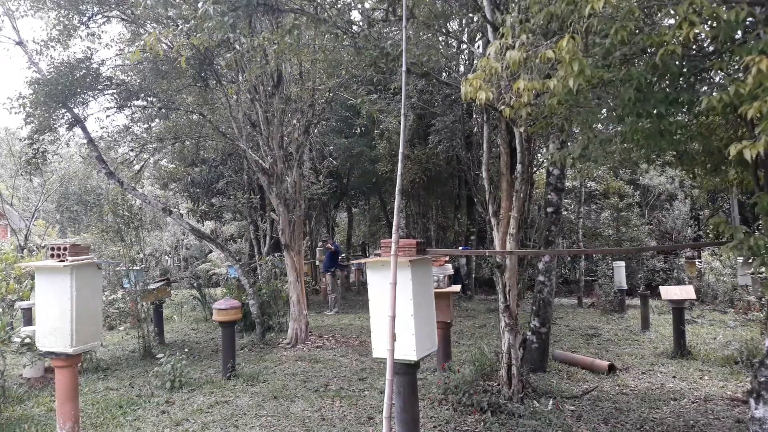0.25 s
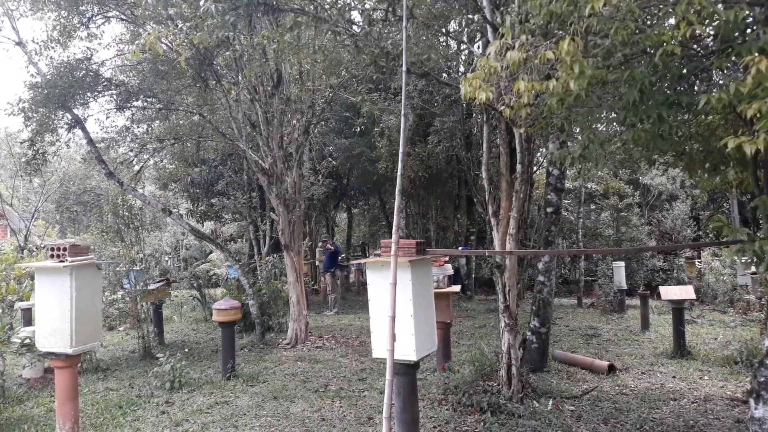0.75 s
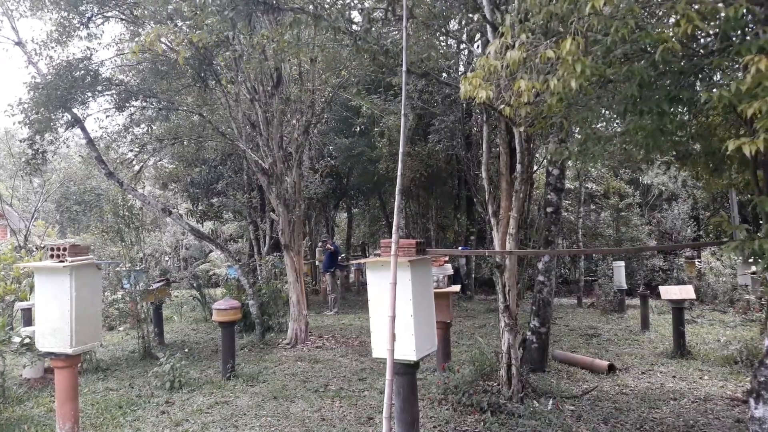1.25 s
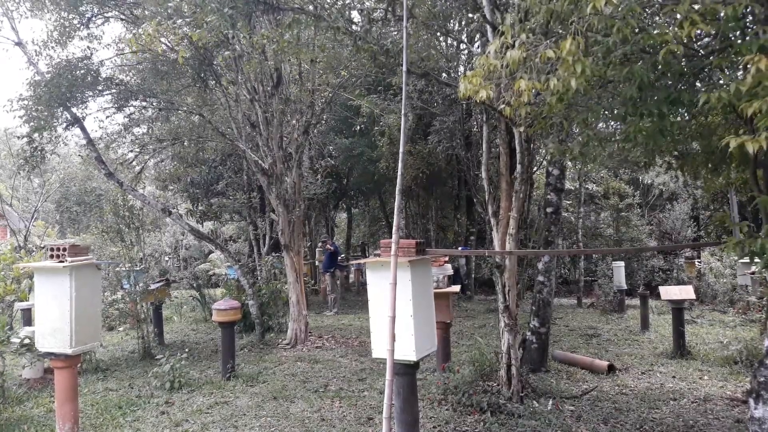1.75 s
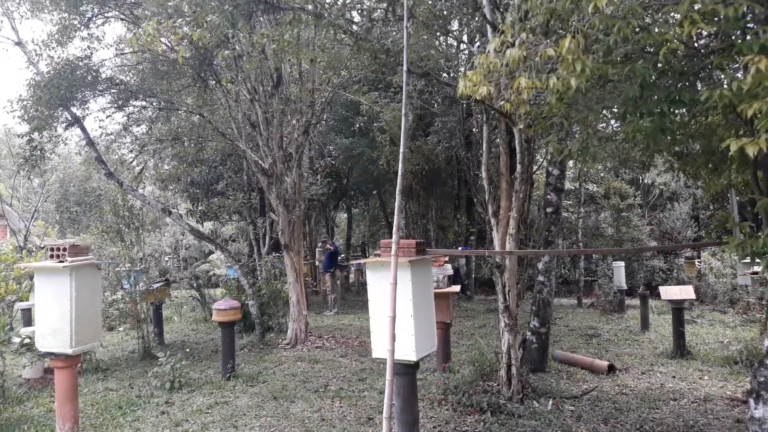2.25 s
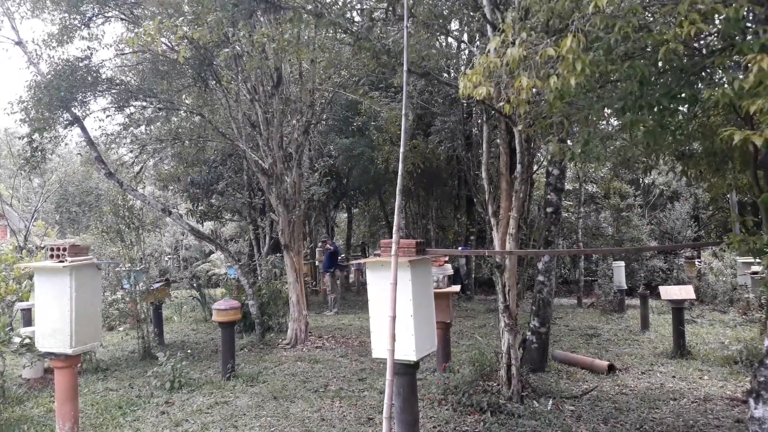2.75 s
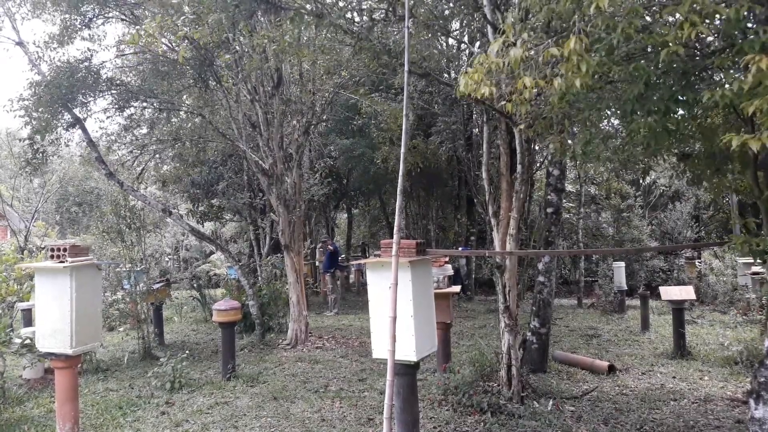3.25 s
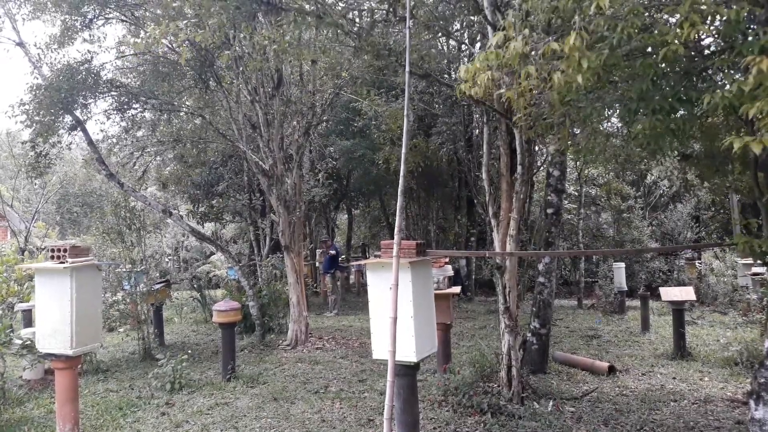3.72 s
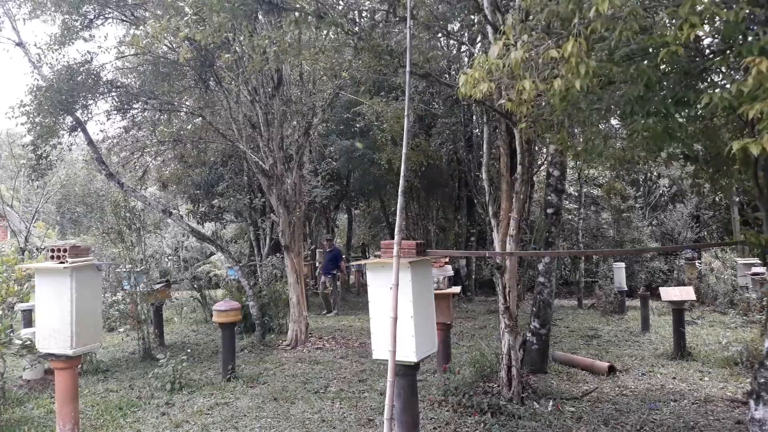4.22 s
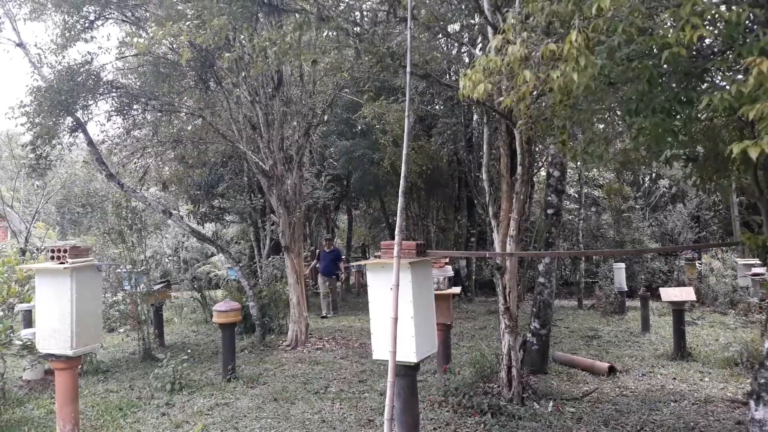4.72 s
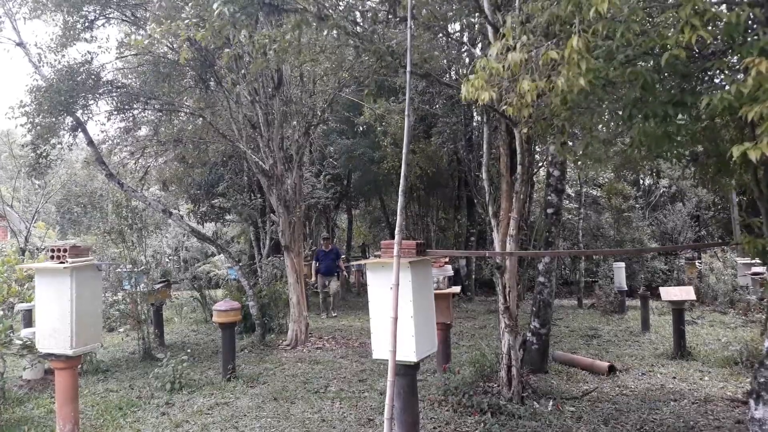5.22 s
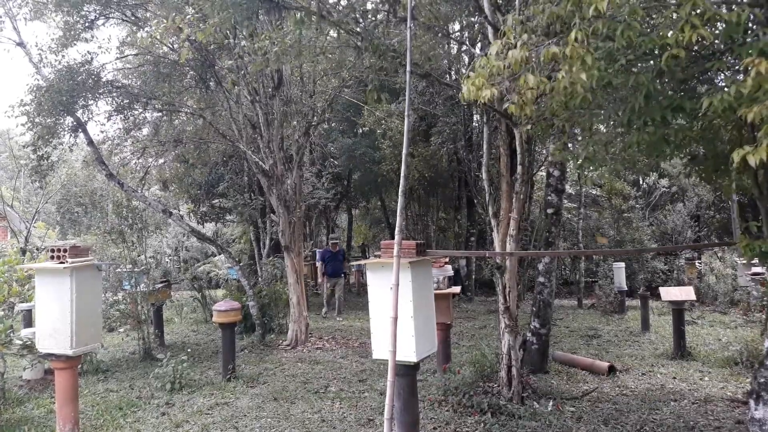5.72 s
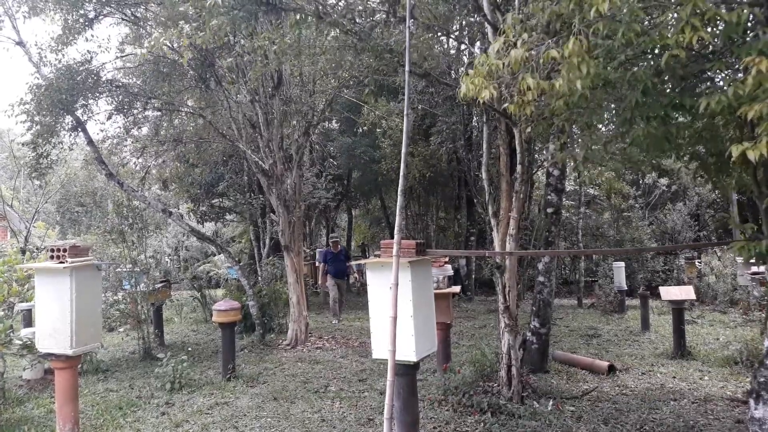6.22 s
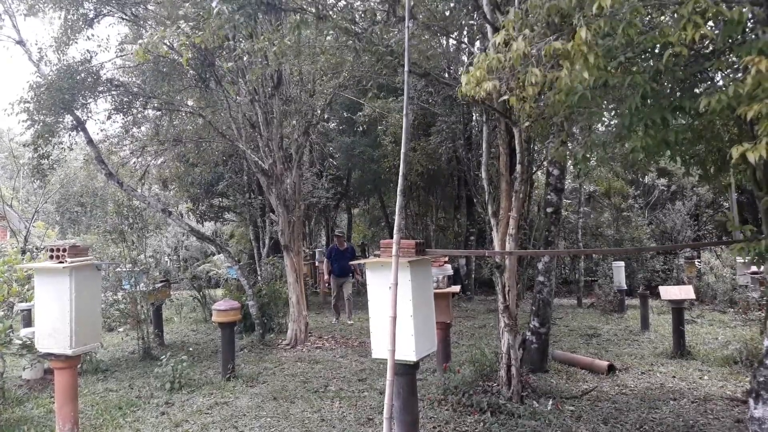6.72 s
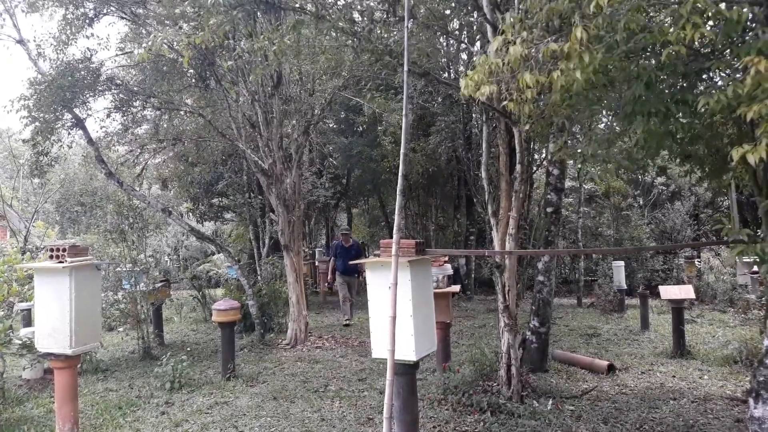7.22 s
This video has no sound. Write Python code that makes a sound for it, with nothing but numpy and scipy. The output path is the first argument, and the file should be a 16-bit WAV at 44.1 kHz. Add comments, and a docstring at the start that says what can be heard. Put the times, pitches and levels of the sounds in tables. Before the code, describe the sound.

Outdoors in a breezy wooded garden, one sharp close slingshot snap and woody knock echo off trunks, followed later by a softer distant double knock.

```python
"""Slingshot in a wooded garden

Wind, as fluttering bands of noise, hisses through the trees and slowly eases; low gusts buffet the microphone.
A slingshot cracks twice among lesser snaps: a short noise burst, the knock of the pellet on wood as decaying
modes, then echoes scattered by the trunks as decaying noise. Narrow noise bands give a brief whoosh, then
faint swelling hums, perhaps a distant vehicle. The recorder is mono; its gain control ducks for a second
after the first, loudest crack, then creeps back."""
import sys
import numpy as np
from scipy import signal
from scipy.fft import rfft, irfft, next_fast_len
from scipy.io import wavfile
from scipy.ndimage import uniform_filter1d, minimum_filter1d

SR = 44100
rng = np.random.default_rng(int(sys.argv[2]) if len(sys.argv) > 2 else 0)


def materialize(psi):
    """Save the field psi as 16-bit PCM at rate SR to the path in sys.argv[1].

    A 1-D psi becomes a single channel; in a 2-D psi each row is a channel.
    """
    bounded = np.clip(np.atleast_2d(psi).T, -1, 1)
    quanta = np.round(bounded * 32767).astype(np.int16)
    wavfile.write(sys.argv[1], SR, quanta)


N = 329427
TIME = np.arange(N) / SR  # time in the scene, s
AGE = np.arange(24000) / SR  # time since a snap or knock began, s

# snaps of rubber, pellet and twigs:
# t/s, level/dB, brightness/(dB per octave), echo/dB, treble lost to distance/dB at 12 kHz
SNAPS = [(3.2830, -19, 5.5, -2.5, 17), (3.314, -31, 4, 2, 0), (3.4055, -7.5, -1, 1.5, 0),
         (3.562, -34.5, 5, -1, 0), (4.005, -32.5, 0.5, 0, 3), (4.052, -34.5, 4, 0, 3),
         (4.382, -36, 2, -3, 6), (6.056, -18.5, -4, 0, 5), (6.073, -25, -2, -3, 4),
         (6.0803, -19.5, 1, -1, 20), (6.4257, -25.5, 0.5, 1, 10)]
# spectrum of a snap: f/Hz, density/(dB per Hz)
SNAP_COLOUR = [(200, -18), (1000, -11.5), (2400, -2), (3300, 0), (3900, -4), (4700, 1), (6300, -5),
               (7700, -7), (8900, 2), (10300, -6.5), (14500, -1), (16000, -17)]
# the pellet on wood: t/s, body, ring/dB, near scatter/dB, scatter t60/s, late echo/dB,
# hardness/(dB per octave), rise/s
KNOCKS = [(3.4089, "target", -7.5, -15.5, 0.16, -23, -0.5, 0.00046),
          (6.0615, "trunk", -25, -24.5, 0.23, -31.5, -1, .0005),
          (6.0791, "trunk", -29.5, -29.5, .2, -41, 8.5, .0005),
          (6.433, "branch", -41, -31, 0.088, -38, 4, 0.0009),
          (6.457, "branch", -22.5, -39, .2, -52, -5, 0.012)]
# modes of the near wooden target: f/Hz, level/dB, t60/s
TARGET = [(315, -23.5, 0.35), (436, -23.5, 0.52), (940, -10, 0.22), (1117, -18, 0.26), (1350, -6.5, 0.18),
          (1510, -13, 0.26), (1743, -3, 0.1), (1757, -1.5, 0.13), (1985, -5.5, 0.098), (2210, -9, 0.042),
          (2210, 4, 0.099), (2500, -15, 0.27), (3540, -29, 0.12), (4430, -16, 0.13), (4680, -16, .18)]
# modes of the far trunk: f/Hz, level/dB, t60/s
TRUNK = [(477, -19, .2), (682, -1, 0.068), (918, -5, 0.17), (1070, 11.5, 0.031), (1560, -1, 0.18),
         (2401, -4, .2), (2463, -2, 0.21), (2693, -9, 0.2), (2880, -10, 0.17), (3620, -16, .2),
         (3950, -14, .16)]
# modes of the branch that the pellet glances off: f/Hz, level/dB, t60/s
BRANCH = [(1626, -2, 0.14), (1911, -9, 0.17), (2500, -15, 0.18)]
# spectrum of the echoes around the target: f/Hz, density/(dB per Hz)
TARGET_COLOUR = [(100, -7.5), (400, -5), (750, -4.5), (1000, -8), (1600, -3.5), (2200, -0.5), (3200, -12),
                 (4000, -15), (4800, -7), (6000, -18), (7800, -17), (9200, -10), (10500, -23), (16000, -24)]
# spectrum of the echoes around the trunk and the branch: f/Hz, density/(dB per Hz)
FAR_COLOUR = [(100, -18), (300, -12), (550, -0.5), (1100, -1.5), (2000, -1), (2600, 0), (3700, -8),
              (4500, -14), (6300, -8.5), (7500, -14), (9200, -19), (10500, -23), (16000, -33)]
# each body: modes, echo spectrum
BODIES = {"target": (TARGET, TARGET_COLOUR), "trunk": (TRUNK, FAR_COLOUR), "branch": (BRANCH, FAR_COLOUR)}
# the strongest eddies that hit the microphone: t/s, peak level/dB
EDDIES = [(.048, -25), (.443, -27), (2.867, -32), (3.306, -21.5), (4.341, -20), (4.365, -25),
          (4.495, -22.5), (4.587, -22.5), (4.901, -19), (4.981, -21.5), (5.064, -17), (5.116, -23),
          (5.192, -26), (5.327, -24), (5.627, -26.5), (6.347, -23.5), (6.955, -26)]
# gusts that reach the microphone: t/s, length/s, level/dB
GUSTS = [(0, 0.46, -43), (3.57, .16, -38), (4.31, .4, -37), (4.85, .28, -35.5), (6.02, 0.11, -40.5),
         (6.617, 0.33, -44)]
# spectrum of the turbulence at the microphone: f/Hz, density/(dB per Hz)
RUMBLE = [(20, -18), (40, -7.5), (68, 2.5), (110, 1.5), (180, -6.5), (260, -18.5), (500, -55)]
# spectrum of the wind in the trees: f/Hz, density/(dB per Hz)
TREES = [(50, -24), (100, -7), (160, -3), (228, -1), (380, -3.5), (850, -4), (1280, -9), (1870, -6.5),
         (2750, -10.5), (5190, -14.5), (6560, -18), (8830, -15.5), (10200, -23), (15800, -26.5)]
# a brief whoosh, then faint hums, perhaps a distant vehicle: t/s, half length/s, f/Hz, level/dB
WHOOSH_AND_HUMS = [(.12, 0.15, 920, -45), (.95, 0.17, 228, -46.5), (1.397, 0.17, 245, -49),
                   (2.4, 0.076, 217, -43.5)]

SNAP_S = 0.0021  # length of a snap's burst
# an eddy of the reference strength: pitch and half length; stronger ones pass faster and are more abrupt
EDDY_DB, EDDY_HZ, EDDY_S = -25, 111.2, 0.0058
EDDY_DB_PER_OCTAVE, EDDY_DB_PER_HALVING = 24, 11
GUST_ATTACK_S, GUST_RELEASE_S = 0.04, 0.12
# turbulence in the lulls between gusts slowly builds
LULL_DB, LULL_DB_PER_S = -53.5, 0.65
# the wind in the treetops starts strong and eases towards a steady strength
BREEZE_START_DB, BREEZE_END_DB, BREEZE_EASE_S = 1.5, -6.0, 8.15
TOP_HZ = 15800  # upper band edge of the recorder


def snaps(echo_t60=0.26, patchy_db=3.0):
    """Impulse and scattering: trunks and foliage throw a burst of milliseconds back as a patchy spray."""
    out = np.zeros(N)
    size = len(AGE)
    for start, db, tilt, echo_db, loss_db in SNAPS:
        pulse = AGE * np.exp(-np.minimum(1.9 * AGE / SNAP_S, 10) ** 2)
        burst = noise(SNAP_COLOUR, size, tilt, loss_db) * pulse
        swell_and_decay = fade(echo_t60) * (1 - fade(0.011))
        spray = noise(SNAP_COLOUR, size, tilt, loss_db) * swell_and_decay
        spray = spray * undb(patchy_db * walk(304, size=size))
        # the level is the rms over the length of the burst
        gain = undb(db) * np.sqrt(SNAP_S / AGE[-1])
        add(out, start, gain * (unit(burst) + undb(echo_db) * unit(spray)))
    return out


def pellets():
    """Impact excitation: one hit on the near target, later double knocks on a far trunk and a branch."""
    out = np.zeros(N)
    for start, body, *blow in KNOCKS:
        modes, colour = BODIES[body]
        add(out, start, knock(modes, colour, *blow))
    return out


def knock(modes, colour, ring_db, scatter_db, scatter_t60, late_db, hardness, rise_s, late_t60=0.85):
    """Modal ringing and reverberation: a harder contact favours the modes above 1.5 kHz.

    Near trunks scatter the knock densely; the deeper wood answers faintly and longer."""
    ring = 0
    for hz, db, t60 in modes:
        gain = undb(db + hardness * np.log2(hz / 1500))
        ring = ring + gain * fade(t60) * np.sin(2 * np.pi * (hz * AGE + rng.random()))
    near_scatter = undb(scatter_db) * fade(scatter_t60)
    late_echo = undb(late_db) * fade(late_t60)
    echoes = noise(colour, len(AGE)) * (near_scatter + late_echo)
    return (undb(ring_db) * ring + echoes) * (1 - np.exp(-AGE / rise_s))


def buffeting(lumpy_db=3.3, chirp=0.22):
    """Turbulent pressure: each big eddy swings the diaphragm once or twice, slowing as it passes."""
    lumps = unit(undb(lumpy_db * walk(30)))
    out = noise(RUMBLE, next_fast_len(N, True))[:N] * lumps * gusts()
    t = np.arange(-1800, 1800) / SR  # time from the middle of the eddy
    for middle, db in EDDIES:
        hz = EDDY_HZ * 2 ** ((db - EDDY_DB) / EDDY_DB_PER_OCTAVE)
        length = EDDY_S * 0.5 ** ((db - EDDY_DB) / EDDY_DB_PER_HALVING)
        cycles = np.cumsum(hz * (1 - chirp * np.tanh(t / length))) / SR
        swing = np.sin(2 * np.pi * (cycles + rng.random()))
        add(out, max(middle + t[0], 0), undb(db) * np.exp(-(t / length) ** 2) * swing)
    return out


def gusts():
    """Addition of powers: each gust rises quickly, holds, then dies back into the lull."""
    power = undb(LULL_DB + LULL_DB_PER_S * TIME) ** 2
    for start, length, db in GUSTS:
        rise = np.clip((TIME - start) / GUST_ATTACK_S, 0, 1)
        fall = np.exp(-np.maximum(TIME - start - length, 0) / GUST_RELEASE_S)
        power = power + (undb(db) * rise * fall) ** 2
    return np.sqrt(power)


def trees(level_db=-37.0, leaf_hz=3500, leaf_growth=1.36, flutter_db=0.63):
    """Aeolian noise of the crowns: leaf hiss follows the wind more steeply than the roar.

    Wide overlapping bands flutter independently, the low ones most."""
    size = next_fast_len(N, True)
    spectrum = rfft(noise(TREES, size))
    f = np.fft.rfftfreq(size, 1 / SR)
    strength = breeze()
    centres = [250, 700, 2000, 5500, 12000]  # f/Hz
    out = 0
    for hz, share in zip(centres, np.eye(len(centres))):
        # triangular bands that add up to the whole spectrum
        band = irfft(spectrum * np.interp(f, centres, share), size)[:N]
        leafy = hz / (hz + leaf_hz)
        flutter = (1 - leafy) * flutter_db * walk(14)
        out = out + band * undb(strength * (1 + leaf_growth * leafy) + flutter)
    return undb(level_db) * out


def breeze():
    """Exponential relaxation: strength of the wind in the treetops, in dB, as it eases."""
    return BREEZE_END_DB + (BREEZE_START_DB - BREEZE_END_DB) * np.exp(-TIME / BREEZE_EASE_S)


def whoosh_and_hums(width=0.11):
    """Band-limited noise: a brief whoosh near 920 Hz, then faint swelling hums near 230 Hz."""
    out = np.zeros(N)
    for middle, length, hz, db in WHOOSH_AND_HUMS:
        b, a = signal.butter(2, [hz * (1 - width), hz * (1 + width)], "band", fs=SR)
        band = signal.lfilter(b, a, rng.standard_normal(N))
        swell = np.exp(-np.minimum(abs(TIME - middle) / length, 10) ** 2)
        out += undb(db) * unit(band) * swell
    return out


def noise(colour, size, tilt=0, loss_db=0):
    """Spectral shaping: noise of rms 1, tilted in dB per octave, less an air loss given at 12 kHz."""
    f = np.maximum(np.fft.rfftfreq(size, 1 / SR), 1)
    hz, density_db = np.transpose(colour)
    shape_db = np.interp(np.log2(f), np.log2(hz), density_db, left=-100)
    air_db = loss_db * (f / 12000) ** 2  # absorption grows as frequency squared
    gain = undb(shape_db + tilt * np.log2(f) - air_db)
    return unit(irfft(rfft(rng.standard_normal(size)) * gain, size))


def walk(rate, size=N):
    """Random modulation: straight lines between normal draws, `rate` draws per second."""
    steps = np.arange(size) * (rate / SR)
    return np.interp(steps, np.arange(512), rng.standard_normal(512))


def fade(t60):
    """Exponential decay: 60 dB down after t60 seconds."""
    return np.exp(-np.log(1000) * AGE / t60)


def undb(db):
    """Logarithmic level: decibels to amplitude gain."""
    return np.exp(np.log(10) / 20 * np.asarray(db))


def unit(x):
    """Normalization: scale to rms 1."""
    return x / np.sqrt(np.mean(x ** 2))


def add(out, start, x):
    """Superposition: mix x into out from time start/s on."""
    i = int(start * SR)
    out[i:i + len(x)] += x[:N - i]


def scene():
    """Superposition: everything meets at one microphone, which feeds both channels."""
    mono = snaps() + pellets() + buffeting() + trees() + whoosh_and_hums()
    return np.tile(mono, (2, 1))


def gain_control(x, threshold_db=-11.5, hold_s=1.0, release_s=0.52):
    """Level-dependent gain: a loud sound turns it down at once; it is held, then creeps back."""
    power = uniform_filter1d(x[0] ** 2, int(0.012 * SR))
    cut_db = np.minimum(threshold_db - 10 * np.log10(np.abs(power) + 1e-12), 0)
    hold, release = int(hold_s * SR), int(release_s * SR)
    # the origins make both windows look back in time
    held = minimum_filter1d(cut_db, hold, origin=(hold - 1) // 2)
    released = uniform_filter1d(held, release, origin=(release - 1) // 2)
    return x * undb(np.minimum(held, released))


def record(dry, wind_cut_hz=38):
    """Band limiting and overload: low cut against wind, gain control, clipping, steep treble cut."""
    low_cut = signal.butter(3, wind_cut_hz, "high", fs=SR, output="sos")
    trimmed = signal.sosfilt(low_cut, dry)
    clipped = np.clip(gain_control(trimmed), -1, 1)
    treble_cut = signal.ellip(10, 0.2, 80, TOP_HZ, fs=SR, output="sos")
    return signal.sosfilt(treble_cut, clipped)


dry = scene()
out = record(dry)
materialize(out)
```